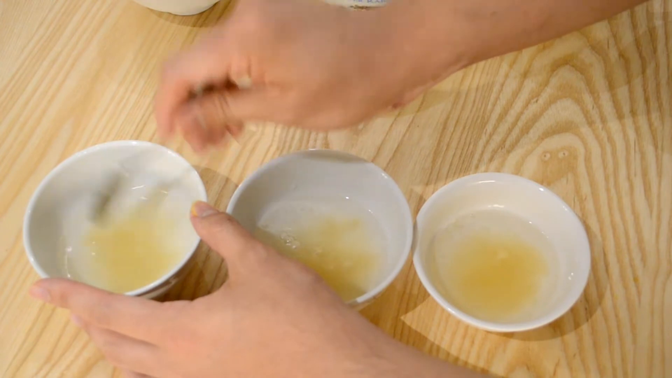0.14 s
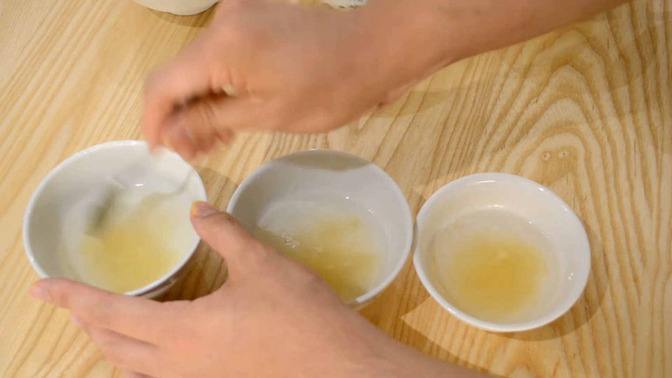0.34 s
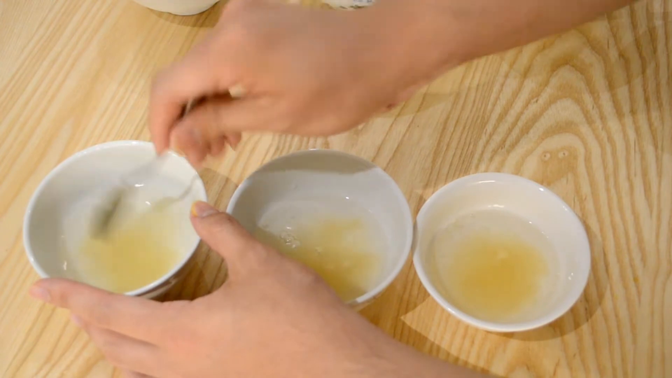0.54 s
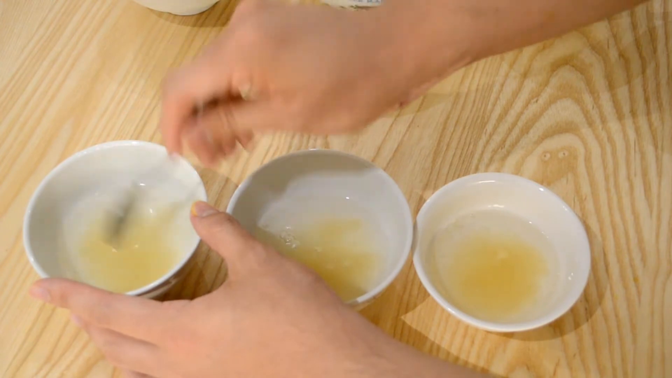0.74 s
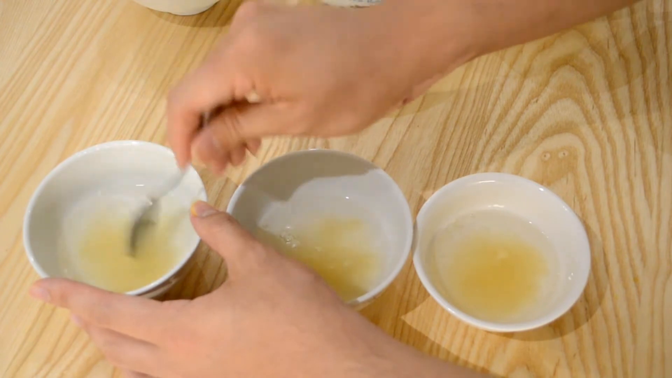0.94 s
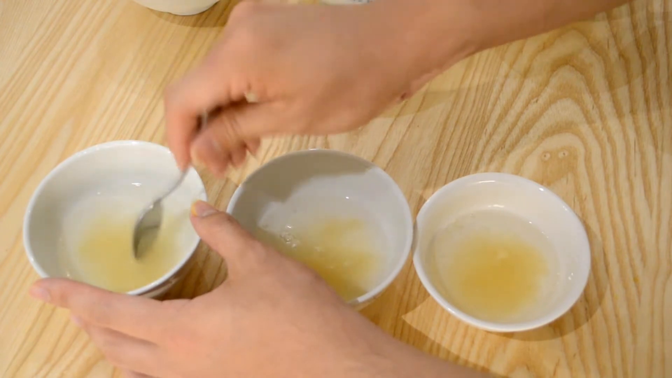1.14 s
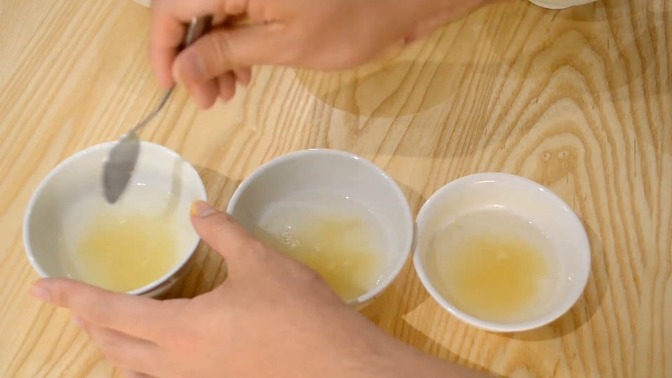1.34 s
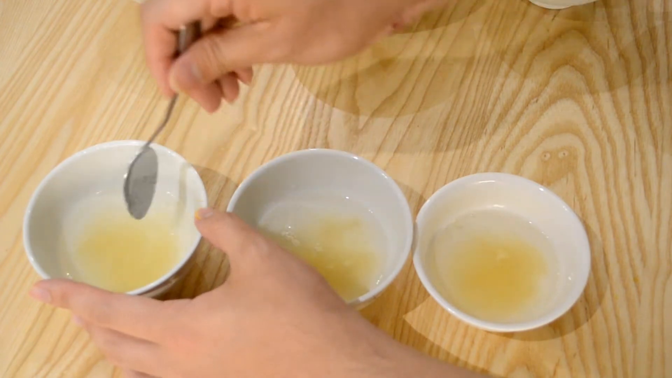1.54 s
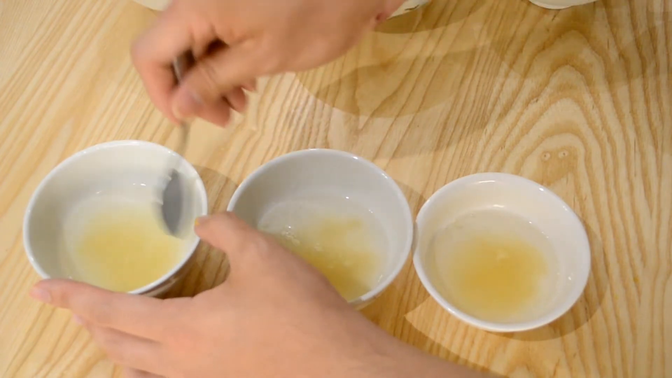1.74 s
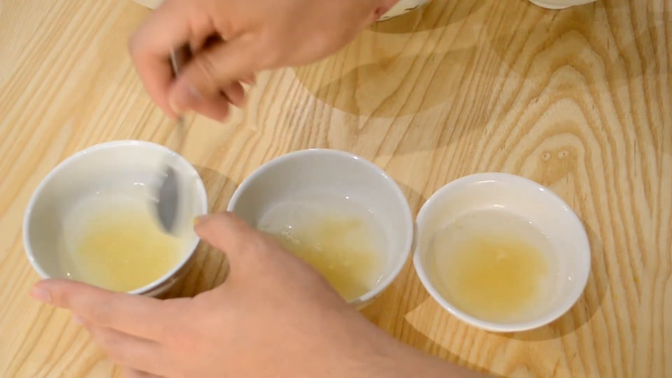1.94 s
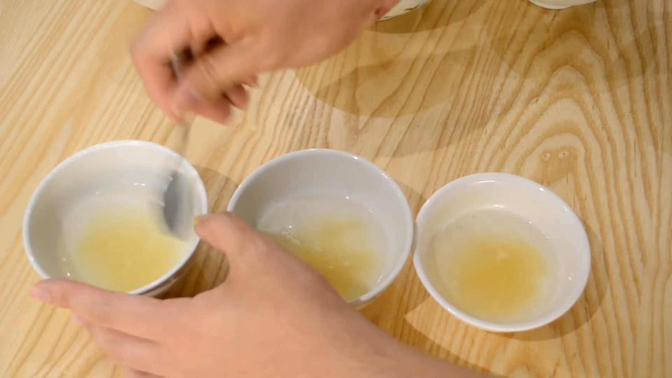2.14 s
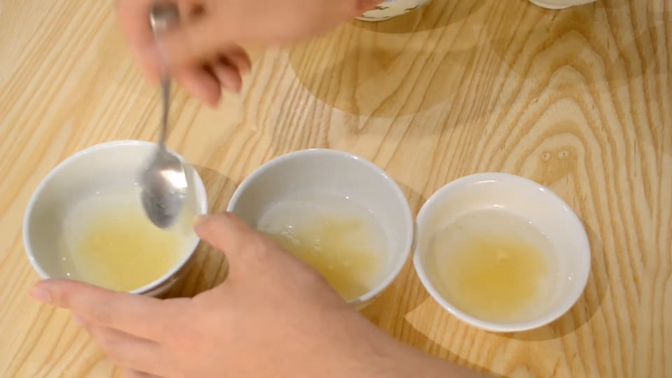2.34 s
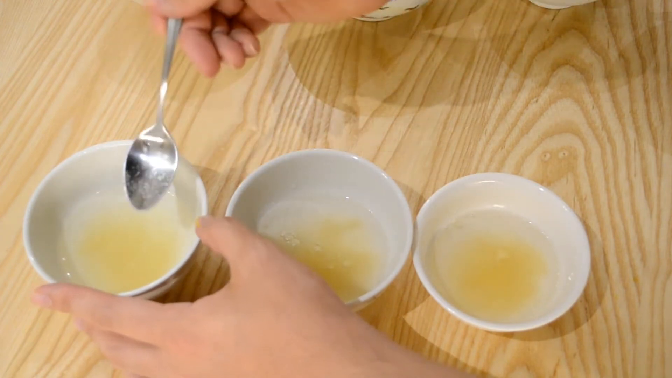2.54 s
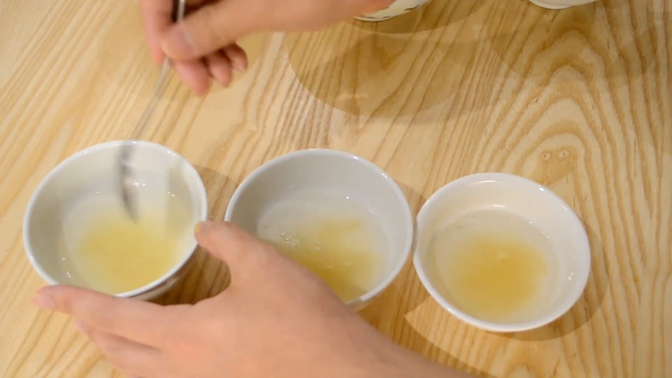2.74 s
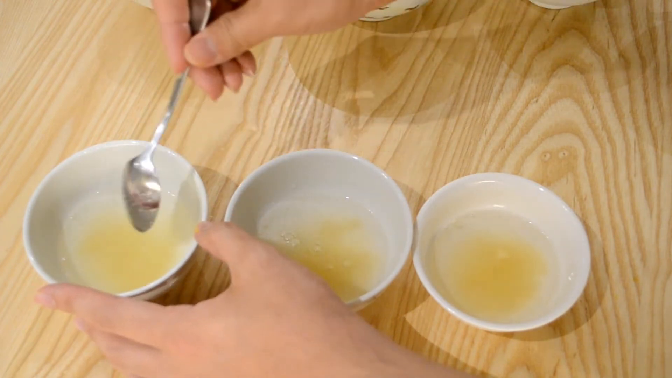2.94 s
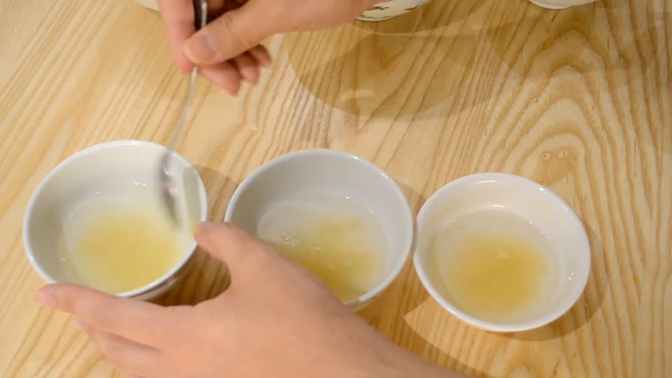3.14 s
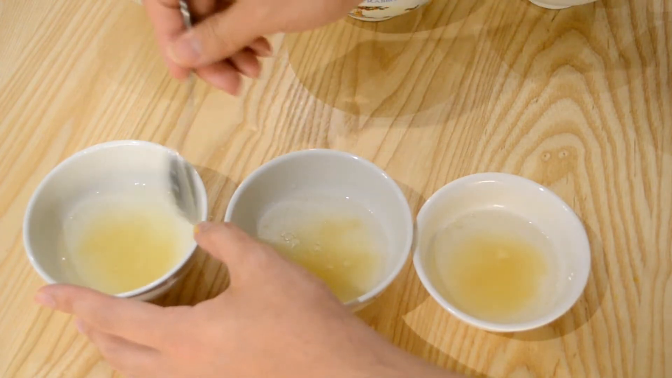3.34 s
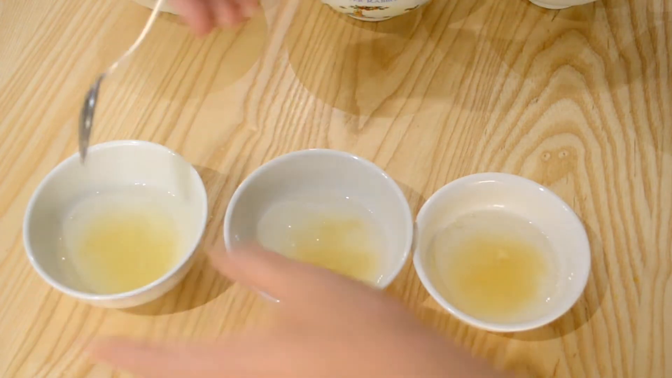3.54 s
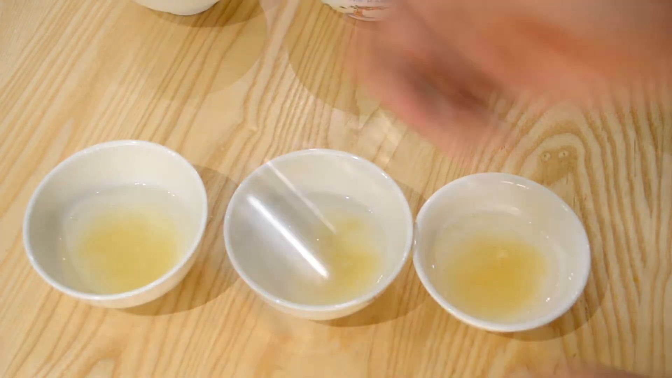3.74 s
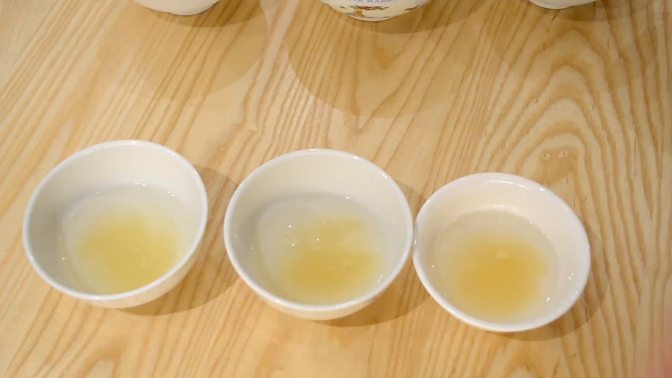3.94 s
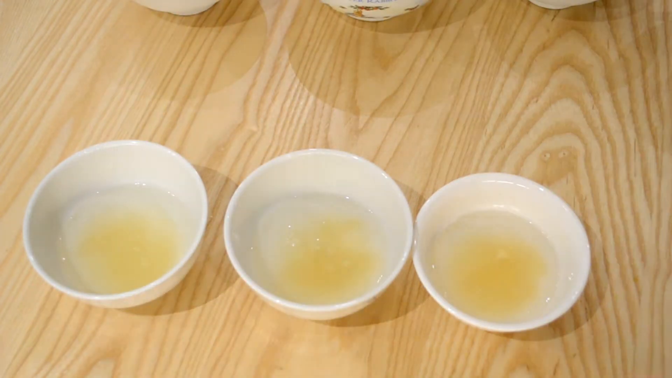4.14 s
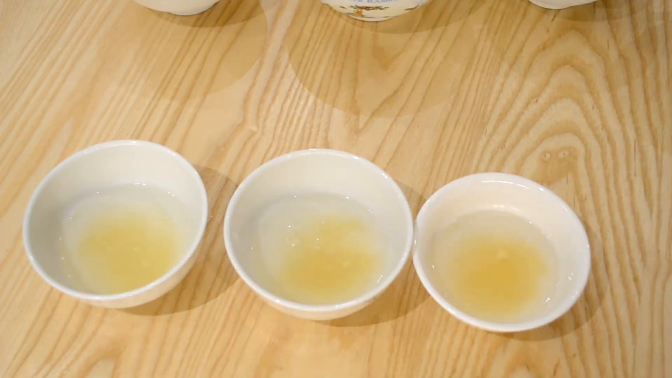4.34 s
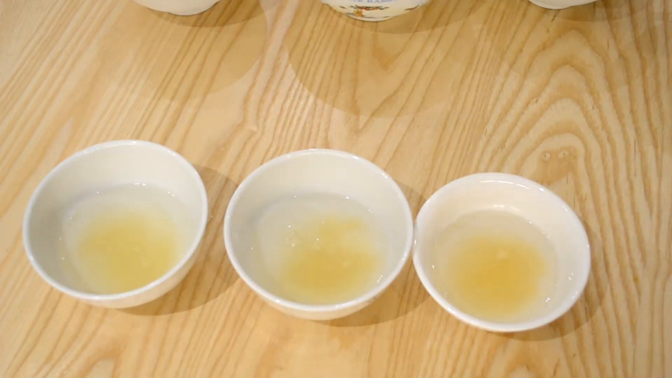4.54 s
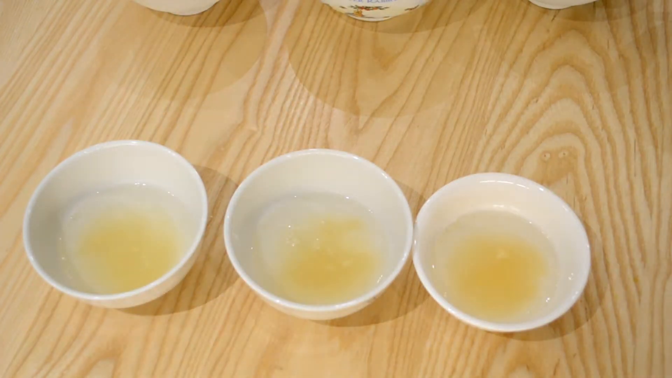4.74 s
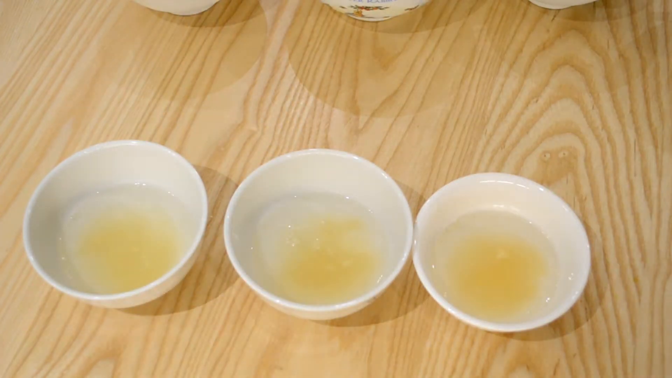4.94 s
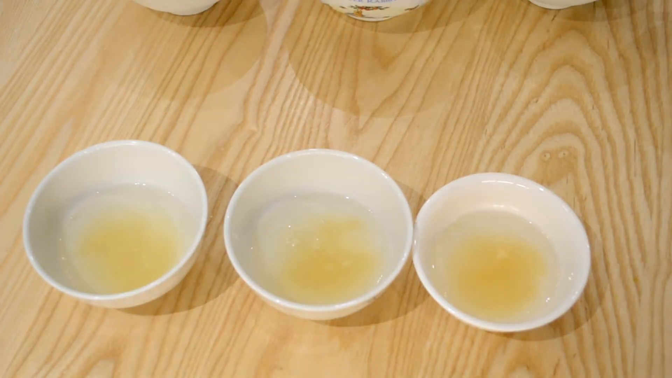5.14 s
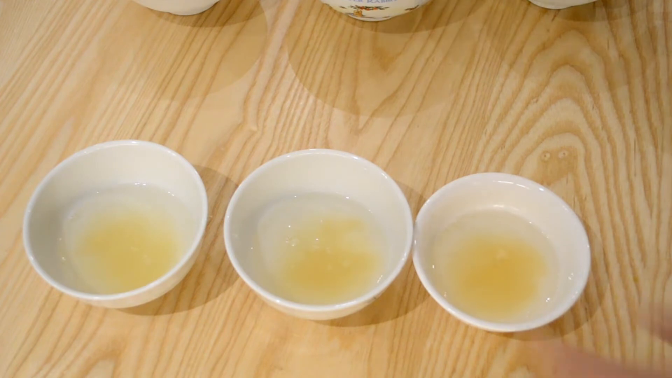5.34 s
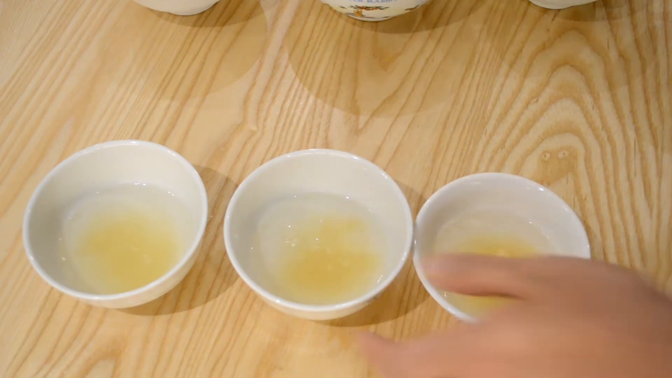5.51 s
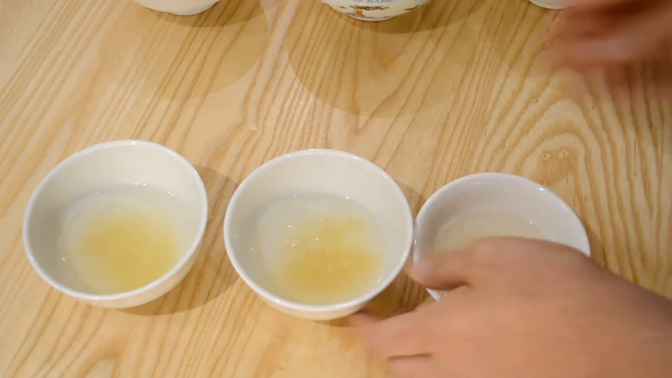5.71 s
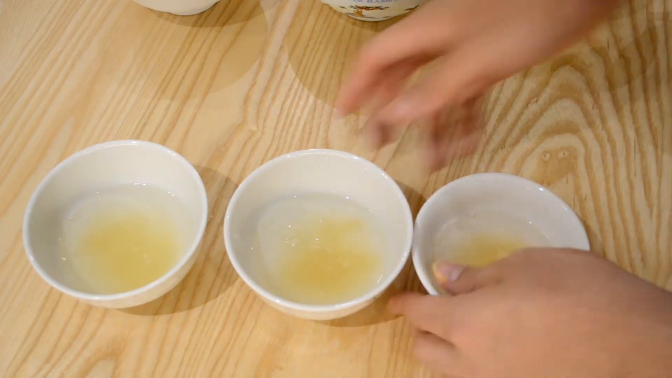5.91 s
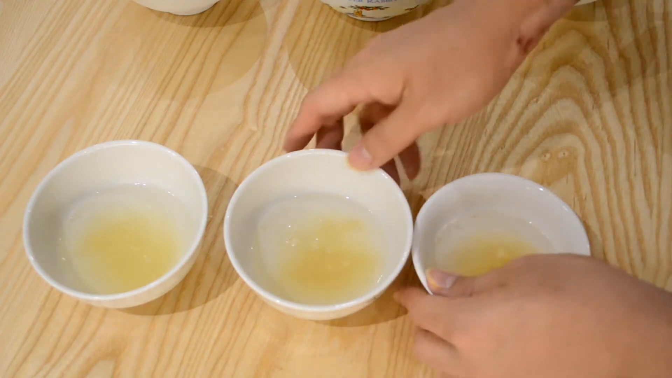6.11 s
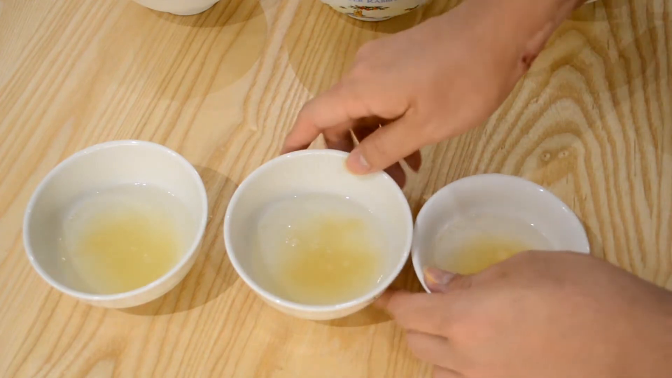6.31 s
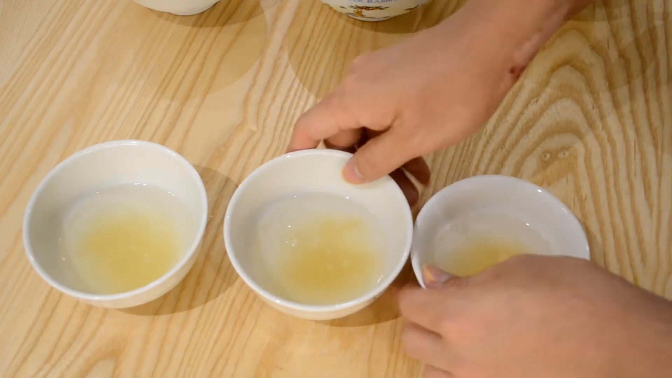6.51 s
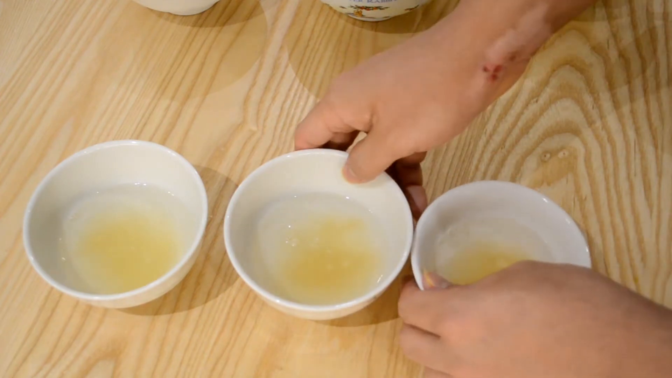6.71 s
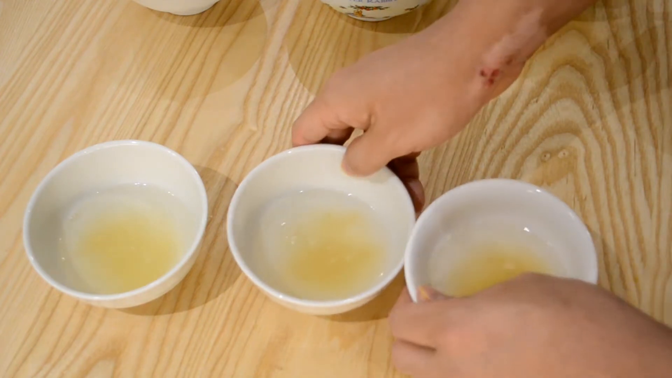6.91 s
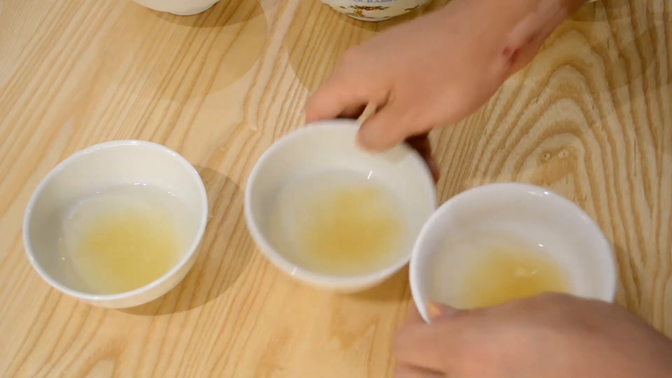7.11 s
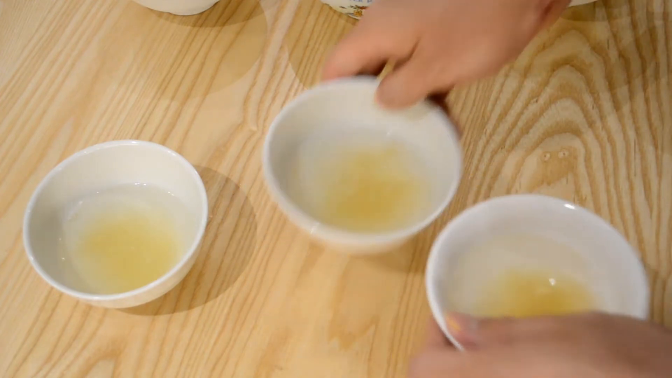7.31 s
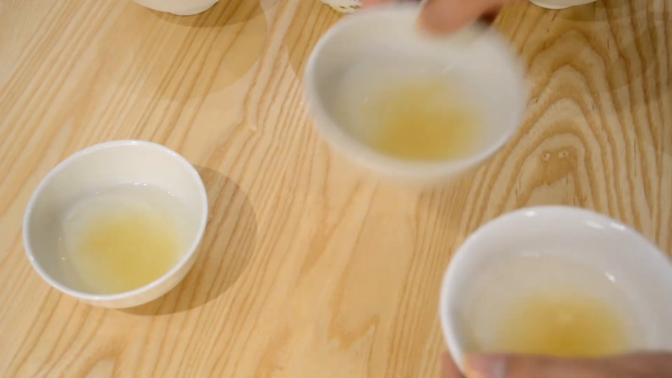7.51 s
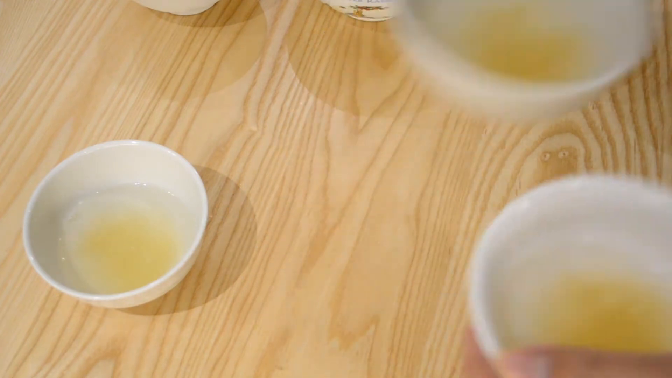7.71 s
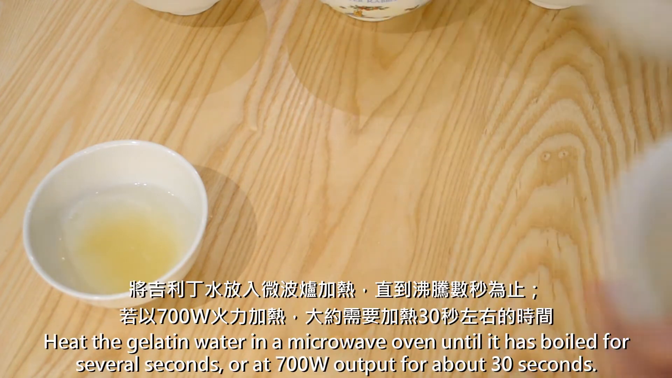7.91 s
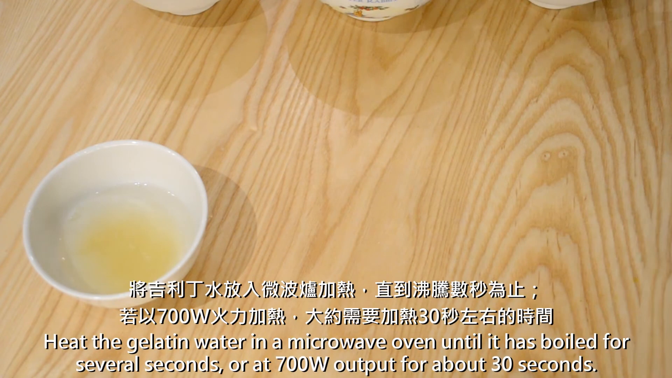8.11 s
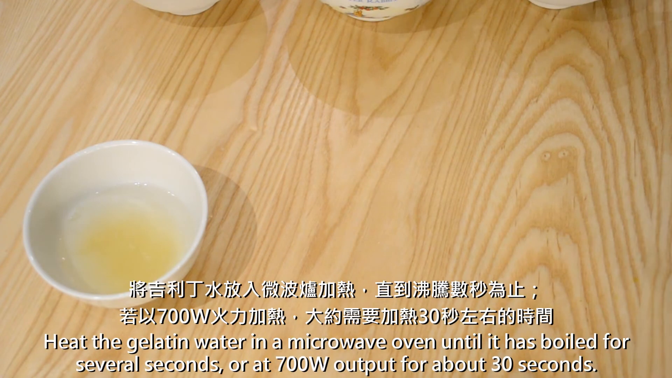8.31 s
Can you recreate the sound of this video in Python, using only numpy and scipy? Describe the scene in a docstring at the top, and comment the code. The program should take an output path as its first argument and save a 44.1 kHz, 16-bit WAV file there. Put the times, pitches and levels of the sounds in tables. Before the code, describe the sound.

A steel spoon nudges a china bowl on a wooden table, then knocks hard inside it five times, evenly, from about 0.3 to 1.2 seconds, close enough to clip the microphone slightly. Between 1.8 and 2.4 seconds it clinks the rim four times, the middle two loud and bright. One more clink at 3.4 seconds leaves the bowl humming for over a second. Further off, a dish gets a light double tap at 4.5 seconds, and the spoon chatters and rings briefly as it is laid down at 4.9. Sleeves brush very faintly from 3.8 to 5.7 seconds and again around 8. From 6.6 seconds two bowls rock on the wood with dull knocks, then bump rims with a short ringing clack at 6.9. The bare kitchen adds a short echo to every blow, over faint, steady room tone.

```python
"""Five knocks, close to the microphone: a steel spoon jabbed into a china bowl on a wooden table.
The spoon then clinks against the rim, and the bowl rings and hums. Sleeves brush; further off a dish
is tapped and the spoon chatters as it is laid down. Two bowls rock and bump as they are picked up.
The place is a bare kitchen that echoes every blow; the camera microphone clips on the hardest ones."""
import sys
import numpy as np
from scipy import signal
from scipy.fft import rfft, irfft
from scipy.io import wavfile
from scipy.ndimage import uniform_filter1d

SR = 44100
rng = np.random.default_rng(int(sys.argv[2]) if len(sys.argv) > 2 else 0)


def bounce(signal):
    """Save signal as a 16-bit WAV file at the path given by the first command-line argument."""
    frames = np.transpose(np.atleast_2d(signal))
    limited = np.clip(frames, -1, 1)
    pcm = np.round(limited * 32767).astype(np.int16)
    wavfile.write(sys.argv[1], SR, pcm)


N = 373080
LEAD = SR // 2  # samples of the scene before time zero
RING_TIME = np.arange(SR) / SR

# close up, spoon on the bowl's bottom; only the first one's tail is heard (t/s, level/dB, snap offset/dB)
KNOCKS = [(-.125, 15, -12), (0.3293, 16, 0.5), (0.5485, 14.5, 3), (0.7543, 17.5, -1), (0.9837, 16, -0.5),
          (1.1792, 15, -1)]
# steel snapping on the glaze (f/Hz, level/dB)
SNAP_COLOUR = [(200, -27), (1000, -15), (2200, 1), (3700, -3.5), (5200, 5), (7000, -1.5), (8800, 2),
               (11000, -4)]
# body of the held bowl under a knock (f/Hz, level/dB)
KNOCK_COLOUR = [(60, -37), (190, -37.5), (290, -13.5), (450, -6), (620, -7.5), (830, -3), (1000, -10.5),
                (1450, -1.5), (2100, -10.5), (3000, -11), (3700, -23.5), (4500, -12), (6500, -20),
                (10500, -29.5)]
# table top under the bowl (f/Hz, level/dB, t60/s)
TABLE_MODES = [(382, -5, 0.65), (466, -4, 0.66), (532.5, -7, 0.15), (670, -4.5, 0.6), (694, 0, 0.24),
               (810, 8, 0.16), (941, -3, 0.96), (1086.4, -1, 0.73), (1158, -0.5, 0.46), (1256, -5, 0.18),
               (1350, -9, 0.5), (1430, -10.5, 0.22), (1484, -3.5, 0.56), (1686, -0.5, .2)]
# echo of the bare kitchen (f/Hz, level/dB, t60/s)
ECHO_BANDS = [(120, -14, .35), (344, 9, 0.31), (710, 5.5, 0.52), (1260, 4, .7), (2800, 0, 0.66),
              (5080, -7.5, 0.47), (7900, -6, 0.61), (12000, -9.5, 0.39)]
# room tone (f/Hz, level/dB)
ROOM_TONE_COLOUR = [(15, -48), (25, -23), (91, -22.5), (152, -5.5), (202, -8), (376, -1.5), (526, -3.5),
                    (927, -2), (1000, -3), (1170, -3), (1550, -8), (1720, -7), (2230, -12.5), (9710, -40.5),
                    (11900, -55), (15500, -81.5), (22000, -120)]
# the spoon nudges the bowl's bottom without ringing it (t/s, level/dB)
NUDGES = [(.099, 0.5)]
# the bowl's foot thumping the table (f/Hz, level/dB)
THUD_COLOUR = [(80, -46), (200, -18), (370, 1.5), (650, -1), (1000, -5.5), (2000, -24), (4000, -40),
               (10000, -57.5)]
# spoon against the rim (t/s, ring level/dB, thud level/dB)
CLINKS = [(1.7806, -13.5, -2), (1.987, 11.5, -6), (2.1571, 16.5, -4.5), (2.3457, -9.5, -3),
          (3.3626, 14, -6.5)]
# higher modes of the bowl's wall, the strong ones in close pairs (f/Hz, level/dB, t60/s)
BOWL_MODES = [(3584, -4, .3), (3592, -4, .14), (6372, 3, .11), (6379, 3, .25), (9802, -3, .1),
              (9812, -3, .18), (4840, -10, .1), (5090, -15, .06), (5400, -17, .06), (6591, -8, .06),
              (6700, -10, .05), (6864, -11, .06), (8990, -20, .08), (11040, -12, .1)]
# the spoon's edge scratching the rim (f/Hz, level/dB)
SCRATCH_COLOUR = [(200, -37.5), (450, -14.5), (1000, -10), (2500, -5.5), (4300, -2), (5100, 7), (5900, 1.5),
                  (6800, 7), (8000, -7.5), (9500, -3), (11000, -13.5)]
# the spoon rebounds from the rim (t/s, level/dB)
REBOUNDS = [(1.8016, -12)]
# the spoon singing in the hand (f/Hz, level/dB, t60/s)
HELD_SPOON_MODES = [(2750, -17, .02), (5150, 0, .045), (8900, -20, .06), (11080, -11, .06)]
# sleeve strokes as the arms move (middle t/s, half length/s, level/dB)
BRUSHES = [(3.779, .035, -63), (4.578, 0.079, -59), (4.878, .04, -61.5), (5.217, 0.063, -59),
           (5.577, 0.12, -58), (7.955, .08, -61.5), (8.271, 0.11, -58.5)]
# cloth friction (f/Hz, level/dB)
CLOTH_COLOUR = [(500, -22), (1500, 4), (4000, 1), (6000, -4), (9000, -6.5), (11000, -16)]
# light taps on a dish further off (t/s, level/dB)
TAPS = [(4.4788, -6.5), (4.5088, -7.5)]
# body of that dish (f/Hz, level/dB)
TAP_COLOUR = [(120, -52), (200, -31), (294, -19), (336, -29), (372, -19), (511, -17), (832, -0.5),
              (1000, -15), (1090, -17), (1200, -5), (1630, 1), (1860, -14), (2200, -6.5), (2930, -10),
              (11000, -44), (14300, -84), (22000, -120)]
# bounces of the spoon as it is laid down (t/s, level/dB)
CHATTER = [(4.9178, 0), (4.932, -9.5), (4.958, -7.5), (4.976, -14.5)]
# contact of each bounce (f/Hz, level/dB)
CHATTER_COLOUR = [(88, -48), (150, -23), (375, -19), (528, -11), (716, -8), (1250, -4.5), (1790, -9),
                  (4480, -7.5), (5080, -11.5), (5970, -7), (6300, -17), (11000, -35), (14300, -73),
                  (22000, -120)]
# the spoon ringing loose (f/Hz, level/dB, t60/s)
LOOSE_SPOON_MODES = [(382, -4, 0.16), (4550, 5.5, 0.055), (5900, 0.5, 0.47), (8700, -6, 0.11),
                     (8915, -7, 0.19), (10900, -23, .2)]
# tipped bowls rock on the table (t/s, level/dB)
ROCKS = [(6.6205, -8), (6.7215, -12.5), (6.8814, -10)]
# dull contact of china on wood (f/Hz, level/dB)
ROCK_COLOUR = [(80, -35.5), (200, -12), (300, -1.5), (390, 0), (520, -6), (700, -3.5), (1000, -19),
               (2000, -30), (4000, -50), (10000, -64)]
# two bowls bump and settle as they are lifted (t/s, level/dB)
BUMPS = [(6.8814, 2), (6.891, -6.5), (6.908, -10.5)]
# clack of rim on rim (f/Hz, level/dB)
BUMP_COLOUR = [(60, -40), (150, -28), (330, 0), (850, -6), (1400, -5.5), (2500, -10.5), (4500, -11.5),
               (6000, -20), (7200, -8.5), (11000, -49)]
# both bowls ringing together (f/Hz, level/dB, t60/s)
BOWL_PAIR_MODES = [(850, -3, .1), (1299, -6, .06), (1465, -4, .08), (1685, -6, .08), (7480, -4, .08),
                   (9770, -8, .08), (3569, -9, .08), (4098, 0, .18), (4212, -1, .12), (6414, 1, .24),
                   (6540, -6, .1)]


def undb(db):
    """Decibels to gain."""
    return 10 ** (np.asarray(db) / 20)


def unit(x):
    """Scale a response to unit energy."""
    return x / np.sqrt(np.sum(x ** 2))


def gains(points, size):
    """Gain of (f/Hz, level/dB) points at each bin of a transform of this size."""
    hz, db = np.transpose(points)
    bin_hz = np.maximum(np.arange(size // 2 + 1) * SR / size, 1)
    return undb(np.interp(np.log(bin_hz), np.log(hz), db))


def noise(colour):
    """Coloured noise of rms 1."""
    x = irfft(rfft(rng.standard_normal(N)) * gains(colour, N), N)
    return x / np.std(x)


def fade(t60):
    """Exponential decay, 60 dB down after t60 seconds."""
    return np.exp(-np.log(1000) * RING_TIME / t60)


def crack(colour, grit, t60, size=2048):
    """A sharp contact followed by a short burst of grit, coloured by the struck body."""
    cepstrum = irfft(np.log(gains(colour, size)))[:size // 2]
    cepstrum[1:] *= 2  # minimum phase keeps the attack sharp
    body = irfft(np.exp(rfft(cepstrum, size)))
    force = grit * unit(rng.standard_normal(2 * size) * fade(t60)[:2 * size])
    force[0] += 1
    # the contact drives all frequencies alike, so every blow has the body's colour
    spectrum = rfft(force)
    smooth_power = uniform_filter1d(np.abs(spectrum) ** 2, size=16)
    flat_force = irfft(spectrum / np.sqrt(smooth_power))[:size]
    blow = signal.fftconvolve(flat_force, body)
    return unit(np.pad(blow, (0, SR))[:SR])


def ring(modes, contact_hz=np.inf):
    """Decaying modes, each with its share of the energy; a soft contact spares the high ones."""
    out = 0
    for hz, db, t60 in modes:
        mode = unit(np.cos(2 * np.pi * hz * RING_TIME) * fade(t60))
        out = out + mode * undb(db) / np.hypot(1, (hz / contact_hz) ** 2)
    return unit(out)


def add(track, s, sound):
    """Mix a sound into a track at s seconds."""
    start = LEAD + int(s * SR)
    track[start:start + len(sound)] += sound[:len(track) - start]


def blows(events, colour, grit, t60, modes=None, ring_db=0):
    """A series of contacts on one object, which may ring on."""
    track = np.zeros(LEAD + N)
    for s, db in events:
        add(track, s, undb(db) * crack(colour, grit, t60))
        if modes is not None:
            add(track, s, undb(db + ring_db) * ring(modes))
    return track


def spoon_knocks(snap_db=-5, table_db=-10, foot_delay_s=.0015):
    """Close up, steel snaps on the glaze; a moment later the bowl's foot drives the table top."""
    track = np.zeros(LEAD + N)
    for s, db, snap_offset_db in KNOCKS:
        add(track, s, undb(db + snap_offset_db + snap_db) * crack(SNAP_COLOUR, grit=2.4, t60=.0065))
        add(track, s + foot_delay_s / 2, undb(db) * crack(KNOCK_COLOUR, grit=.91, t60=.01926))
        add(track, s + foot_delay_s, undb(db + table_db) * ring(TABLE_MODES))
    return track


def kitchen_echo(build_s=.0036, diffuse_hz=3000):
    """Dense reflections off bare walls build up quickly; the middle register lasts longest."""
    hz, db, t60 = np.transpose(ECHO_BANDS)
    spectrum = rfft(rng.standard_normal(SR))
    octave = np.log2(np.maximum(np.arange(len(spectrum)), 1))
    tail = 0
    for share, band_db, band_t60 in zip(np.eye(len(hz)), db, t60):
        band = irfft(spectrum * np.interp(octave, np.log2(hz), share), SR)
        tail = tail + undb(band_db) * band * unit(fade(band_t60))
    # single room modes stand out in the bass; the treble answers every pitch more evenly
    spectrum = rfft(tail, 2 * SR)
    power = np.abs(spectrum) ** 2
    ripple = uniform_filter1d(power, size=40) / uniform_filter1d(power, size=1200)
    diffuse = np.minimum(np.arange(len(power)) / 2 / diffuse_hz, 1)
    tail = irfft(spectrum / np.sqrt(ripple) ** diffuse)[:SR]
    return tail * (1 - np.exp(-RING_TIME / build_s))


def room_tone(level_db=-50.5):
    """The kitchen's faint, steady air lies under everything."""
    return undb(level_db) * noise(ROOM_TONE_COLOUR)


def foot_thuds():
    """Every nudge and clink pushes the bowl's foot against the table."""
    pushes = NUDGES + [(s, thud_db) for s, _, thud_db in CLINKS]
    return blows(pushes, THUD_COLOUR, grit=.2, t60=.05)


def rim_clinks(cutoff_at_0db_hz=5393, db_per_octave=11, scratch_db=-7):
    """The spoon's edge scratches the rim and rings the wall; the spoon sings when it rebounds."""
    track = np.zeros(LEAD + N)
    for s, db, _ in CLINKS:
        contact_hz = cutoff_at_0db_hz * 2 ** (db / db_per_octave)  # harder is shorter, so brighter
        scratch = undb(scratch_db) * crack(SCRATCH_COLOUR, grit=2.9, t60=.022)
        add(track, s, undb(db) * (ring(BOWL_MODES, contact_hz) + scratch))
    for s, db in REBOUNDS:
        scratch = undb(-15) * crack(SCRATCH_COLOUR, grit=2.45, t60=.015)
        add(track, s, undb(db) * (ring(HELD_SPOON_MODES) + scratch))
    return track


def rim_hum(held_hz=1516, free_hz=1506, held_t60=.11, gripped_t60=.32, loose_t60=1.76, let_go_s=3.3):
    """The rim flexes into an oval in two directions: the thumb damps one, the other rings on."""
    track = np.zeros(LEAD + N)
    for s, db, _ in CLINKS:
        held = ring([(held_hz, 0, held_t60)])
        free_t60 = gripped_t60 if s < let_go_s else loose_t60  # damped until the hand lets go
        # the free mode starts as strong gripped as loose, so its energy grows with its length
        free = undb(-8) * np.sqrt(free_t60) * ring([(free_hz, 0, free_t60)])
        hum_db = -3 + .17 * db  # these lowest modes answer soft and hard blows almost alike
        add(track, s, undb(hum_db) * (held + free))
    return track


def sleeves(flutter_db=1.0):
    """Soft swells of cloth friction, uneven within each stroke."""
    t = np.arange(N) / SR
    swell = sum(undb(db) * np.exp(-((t - s) / half_s) ** 2 / 2) for s, half_s, db in BRUSHES)
    flutter = uniform_filter1d(rng.standard_normal(N), size=400)
    return swell * undb(flutter_db * flutter / np.std(flutter)) * noise(CLOTH_COLOUR)


def dish_taps():
    """Two light contacts on a dish, further from the microphone."""
    return blows(TAPS, TAP_COLOUR, grit=.96, t60=.03)


def spoon_chatter():
    """Laid down further off, the spoon bounces and rings freely."""
    return blows(CHATTER, CHATTER_COLOUR, grit=3.1, t60=.046, modes=LOOSE_SPOON_MODES, ring_db=-5)


def bowl_rocks():
    """Tipped by hand, the bowls rock on the wood with dull knocks."""
    return blows(ROCKS, ROCK_COLOUR, grit=.61, t60=.029)


def bowl_bumps():
    """Glazed rims graze each other with a rough clack, and both bowls ring."""
    return blows(BUMPS, BUMP_COLOUR, grit=4, t60=.04, modes=BOWL_PAIR_MODES)


def scene():
    """Each blow reaches the one microphone directly and by the walls; far ones carry more echo."""
    walls = kitchen_echo()

    def at_mic(track, echo_db):
        echo = signal.oaconvolve(track, walls)[:len(track)]
        return (track + undb(echo_db) * echo)[LEAD:]

    mix = at_mic(spoon_knocks(), echo_db=-2) + room_tone()
    mix += at_mic(foot_thuds(), echo_db=-3)
    mix += at_mic(rim_clinks(), echo_db=2)
    mix += at_mic(rim_hum(), echo_db=0)
    mix += sleeves()
    mix += at_mic(dish_taps(), echo_db=3)
    mix += at_mic(spoon_chatter(), echo_db=8)
    mix += at_mic(bowl_rocks(), echo_db=-5)
    mix += at_mic(bowl_bumps(), echo_db=.5)
    return mix[None]


def record(dry, notch_hz=7900, notch_q=7, notch_depth=.6, mic_top_hz=10900, top_hz=16000):
    """The camera microphone: its port cuts a notch, the top rolls off, and the hardest peaks clip."""
    notched = signal.lfilter(*signal.iirnotch(notch_hz, notch_q, fs=SR), dry)
    port = dry + notch_depth * (notched - dry)
    narrow = signal.sosfilt(signal.butter(18, mic_top_hz, fs=SR, output="sos"), port)
    clipped = np.clip(narrow, -1, 1)
    rounded = signal.sosfilt(signal.butter(2, 13000, fs=SR, output="sos"), clipped)
    return signal.sosfilt(signal.ellip(8, .2, 70, top_hz, fs=SR, output="sos"), rounded)


dry = scene()
out = record(dry)
bounce(out)
```